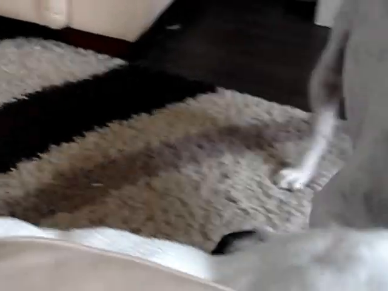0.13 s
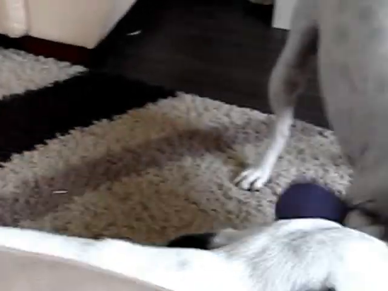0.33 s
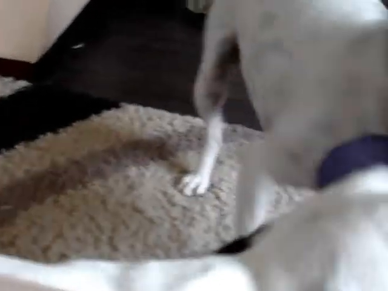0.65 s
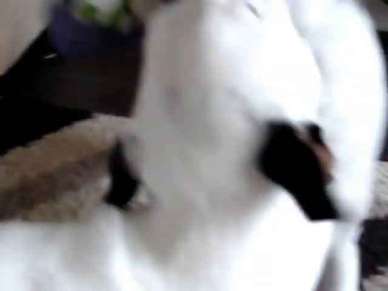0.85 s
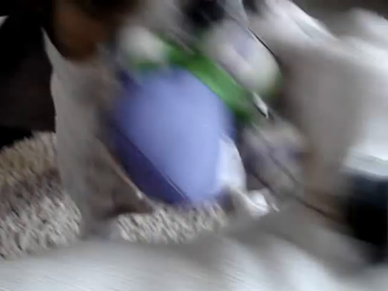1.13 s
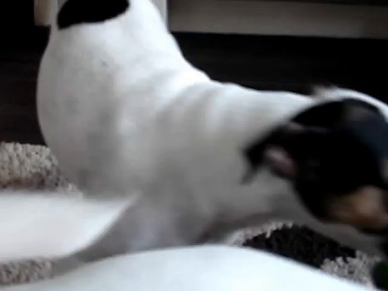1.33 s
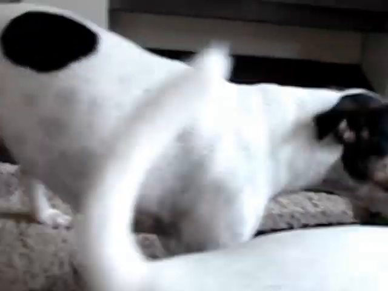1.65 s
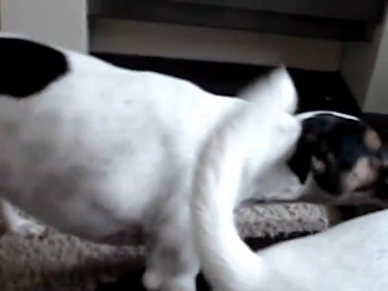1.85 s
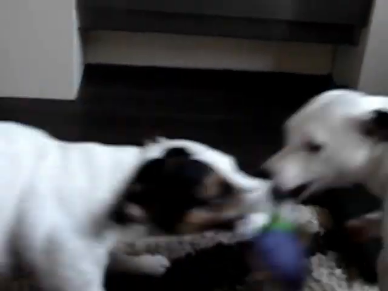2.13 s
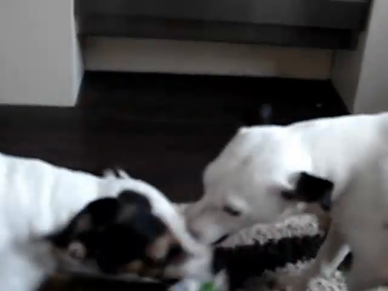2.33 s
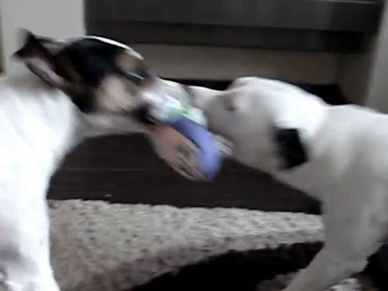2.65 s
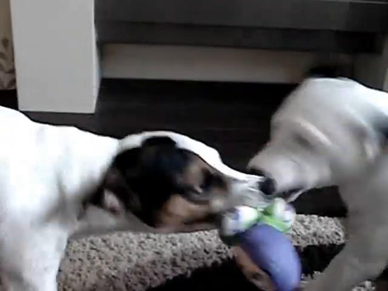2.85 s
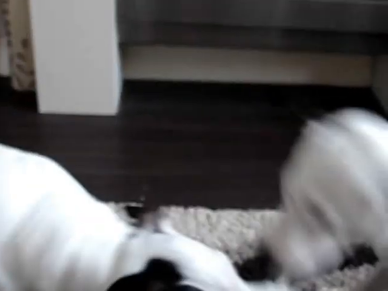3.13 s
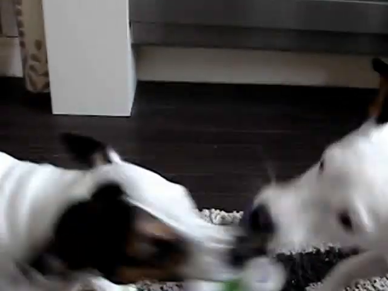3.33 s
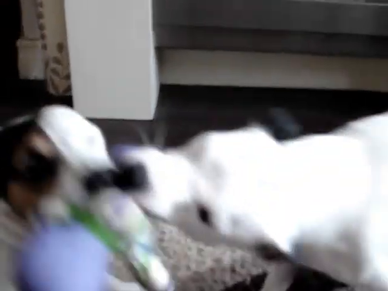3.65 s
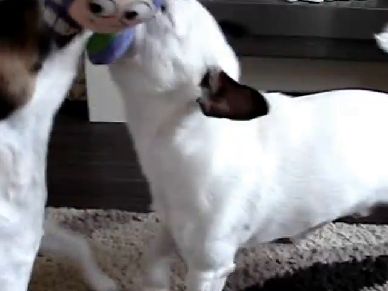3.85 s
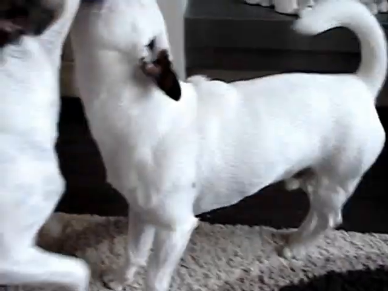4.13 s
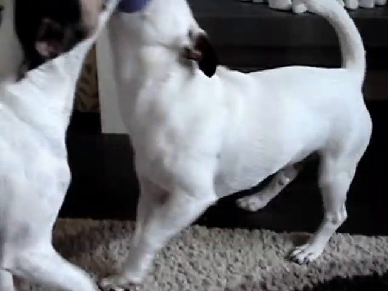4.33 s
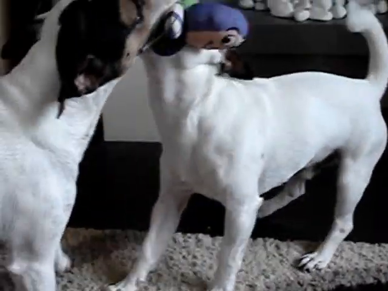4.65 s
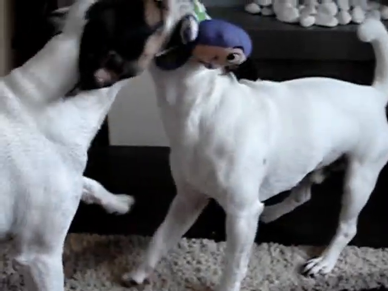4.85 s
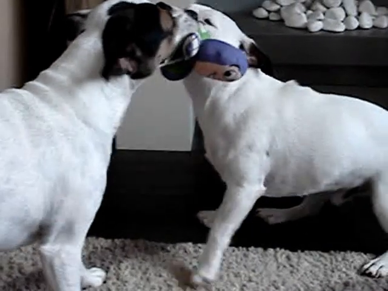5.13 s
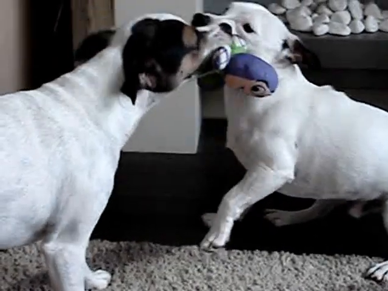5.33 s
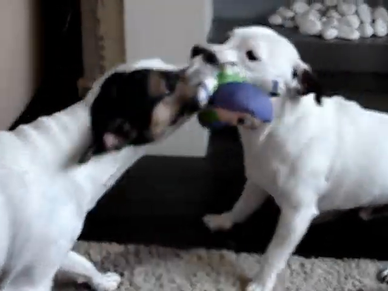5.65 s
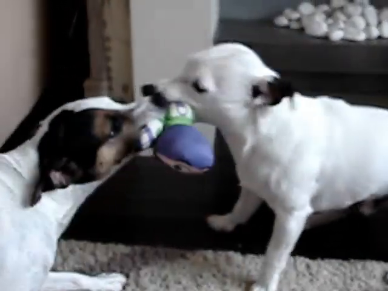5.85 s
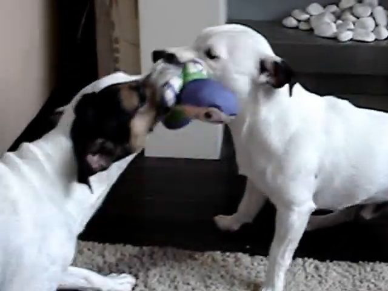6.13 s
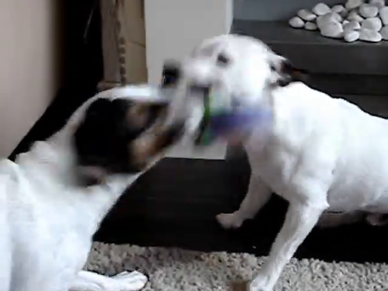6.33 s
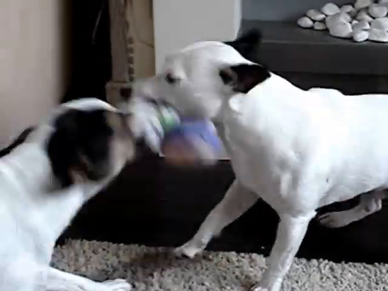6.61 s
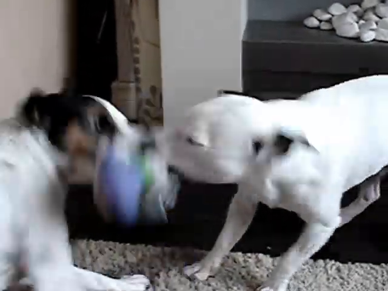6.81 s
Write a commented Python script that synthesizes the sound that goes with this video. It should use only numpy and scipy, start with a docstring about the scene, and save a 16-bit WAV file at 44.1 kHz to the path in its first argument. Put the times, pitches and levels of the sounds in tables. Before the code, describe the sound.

A quiet room with faint noise, heard close up. Claw ticks at 0.1-0.25 s, then from 0.35 to 0.95 s a higher dog growls in jerky surges around 200-290 Hz, half moan, half snarl, with a loud hollow jaw snap at 0.6 and a snuffle after. A lull with ticks near 1.2; softer voiced growls from 1.35 to 1.85. A low rattling growl, mostly near 140 Hz, rolls at 1.9-2.4; the higher one answers until 2.9. The low dog growls again 3.0-3.7, with a sharp tick and scuff at 3.25 and jaw snaps with teeth clicks at 3.35-3.65. Low, subdued rattles run 4.0-5.2. A paw swishes at 5.17, then the higher growl swells 5.35-5.95. The low growl returns 6.05-6.4. From 6.48 to the end a fierce, rough high snarl bursts out, by far the loudest sustained passage, with snorting, grinding and bumps, overloading the microphone.

```python
"""Two small dogs growl in bouts over a plush toy on a living-room rug: one higher and half-voiced, one a low
rattle. Pulses from their vocal folds pass through resonances of throat and mouth; jerks on the toy and hard
starts make the growls surge. Shaped noise makes the snuffles, rustling, scuffs and claw ticks; uneven clicks
make the grinding teeth. Fading tones make the jaw snaps. A room answers, and the loudest moments, such as the
last snarl, overload the microphone."""
import sys
import numpy as np
from scipy import signal
from scipy.fft import rfft, irfft, next_fast_len
from scipy.io import wavfile
from scipy.ndimage import uniform_filter1d, map_coordinates

SR = 44100
rng = np.random.default_rng(int(sys.argv[2]) if len(sys.argv) > 2 else 0)


def materialize(psi):
    """Save the field psi as 16-bit PCM at rate SR to the path in sys.argv[1].

    A 1-D psi becomes a single channel; in a 2-D psi each row is a channel.
    """
    bounded = np.clip(np.atleast_2d(psi).T, -1, 1)
    quanta = np.round(bounded * 32767).astype(np.int16)
    wavfile.write(sys.argv[1], SR, quanta)


N = 307818
TIME = np.arange(N) / SR   # seconds

# A bout is a chain of pushes of air; each swells, peaks and sags. Levels are those before the later trims.
# higher dog: (start [s], rise [s], fall [s], level [dB], roughness at the peak [0-1], mouth resonance [Hz],
#              muzzle resonance [Hz], then relative to the level: chest, throat, snarl, muzzle, rasp [dB])
HIGH_PUSHES = [(0.327, 0.057, 0.03, -30, 0.7, 1010, 2380, -5.5, -4, -9.5, -22, -23),
               (0.39, 0.068, 0.019, -17.5, 0.29, 994, 2440, -5.5, -9, -13, -23.5, -21.5),
               (0.465, 0.026, 0.088, -18.5, 0.26, 975, 2530, -5, -11, -20, -25, -23),
               (0.58, 0.02, 0.17, -24, 0.55, 1040, 2550, -4.5, -4.5, -10.5, -22.5, -16),
               (0.744, 0.092, 0.11, -20.5, 0.65, 980, 2820, -4.5, -6.5, -9.5, -22, -14.5),
               (1.36, 0.093, 0.038, -24.5, 0.24, 1060, 2160, -4, -8, -16, -24, -20),
               (1.48, 0.015, 0.11, -28, 0.15, 1080, 2140, 1, -9.5, -8.5, -15, -22),
               (1.601, 0.19, 0.055, -33.5, 0.17, 1010, 2235, 3, -10, -8, -19.5, -17.5),
               (2.339, 0.093, 0.031, -28, 0.3, 1020, 2550, 0.5, -6.5, -10.5, -13.5, -19.5),
               (2.465, 0.019, 0.084, -28, 0.16, 1025, 2552, 1, -9.5, -9, -18, -16),
               (2.604, 0.05, 0.053, -21.5, 0.3, 927, 2200, -7, -15.5, -14.5, -20, -18),
               (2.732, 0.11, 0.032, -20, 0.19, 955.5, 2322, -7.5, -13, -16, -23, -22),
               (4.159, 0.13, 0.084, -32.5, 0.36, 999.6, 2301, -0.5, 0.5, -10, -16, -13),
               (5.327, 0.099, 0.093, -26.5, 0.66, 1018, 2510, -9.5, -8, -17.5, -17.5, -22),
               (5.524, 0.13, 0.046, -16.5, 0.36, 1014, 2490, -14.5, -11, -20.5, -19, -44),
               (5.669, 0.067, 0.059, -17, 0.09, 995, 2550, -10, -6, -16, -21.5, -32),
               (5.79, 0.02, 0.026, -20.5, 0.4, 992.4, 2519, -13.5, -9, -14, -16.5, -39),
               (5.834, 0.057, 0.1, -25, 0.18, 973.3, 2452, -5.5, -8, -17, -22.5, -41),
               (6.483, 0.0072, 0.025, -16, 0.58, 1005, 2500, -16, -4.5, -15, -17.5, -15.5),
               (6.52, 0.0086, 0.056, -7.5, 0.65, 884, 2325, -16.5, -6, -12.5, -23, -31),
               (6.575, 0.017, 0.039, -8.5, 0.55, 994, 2414, -16, -14.5, -12.5, -28, -30),
               (6.655, 0.021, 0.02, -13, 0.6, 963, 2429, -12, -10, -20, -21.5, -31),
               (6.705, 0.016, 0.047, -12, 0.4, 969, 2440, -11, -13.5, -23, -28, -32),
               (6.767, 0.039, 0.02, -11, 0.5, 1019, 2440, -12, -9, -21, -20.5, -24),
               (6.818, 0.046, 0.14, -10, 0.48, 1035, 2406, -17, -14.5, -17, -22.5, -24)]
# lower dog: (start [s], rise [s], fall [s], level [dB], pitch [Hz], roughness at the peak [0-1],
#             mouth resonance [Hz], then relative to the level: chest, throat, snarl [dB])
LOW_PUSHES = [(0.07, 0.15, 0.04, -44, 127.5, 1.0, 990, -26.0, -25, -33),
              (1.86, 0.0076, 0.076, -31.0, 87.67, 0.7, 961, -2.0, -6, -9.5),
              (1.956, 0.088, 0.12, -36.0, 143.1, 0.5, 1151, 5.0, -1.5, -30),
              (2.184, 0.14, 0.12, -27.5, 142.8, 0.7, 1088, 1.5, -6, -22),
              (2.959, 0.14, 0.095, -21.0, 143.6, 0.6, 1000, -4.0, -9.5, -32.5),
              (3.206, 0.15, 0.074, -25.5, 136.9, 0.7, 1094, 1.0, -4.5, -25),
              (3.445, 0.062, 0.067, -26.5, 139.9, 0.42, 915, -3.0, -8, -5.5),
              (3.622, 0.024, 0.049, -31, 139.3, 1.0, 949, -27.5, -11, -25),
              (4.034, 0.013, 0.12, -37.5, 85.33, 0.8, 987, -5.0, 2, -10.5),
              (4.339, 0.08, 0.2, -26.0, 123.5, 0.85, 948.3, -5.0, -4, -14),
              (4.511, 0.207, 0.194, -27, 137.3, 0.75, 950, -2.0, -2.5, -16.5),
              (4.899, 0.11, 0.24, -37, 133, 0.42, 929.3, 5.5, -2, -21),
              (5.195, 0.06, 0.041, -40.0, 84.93, 0.1, 972.3, -4.5, -12, -20),
              (6.035, 0.0088, 0.24, -23.5, 140.3, 0.63, 965, -6.0, -9, -28.5),
              (6.22, 0.15, 0.19, -28.5, 134.6, 0.7, 975.5, -1.5, -9, -28)]

SAG_DB, SAG_CURVE = 8.5, 1.6   # how much weaker a push is at its ends than at its peak; shape of the arch
ATTACK_S, RELEASE_S = 0.08, 0.18   # time for 60 dB up before a push, and for 60 dB down after it


def from_db(db):
    """Turn decibels into a gain."""
    return 10 ** (np.asarray(db) / 20)


def rms_one(x):
    """Scale a sound to unit power."""
    return x / np.sqrt(np.mean(x ** 2) + 1e-20)


def drift(rate_hz):
    """A smooth random wander of unit power, with rate_hz new random values a second."""
    knots = rng.standard_normal(4000)
    coarse_time = TIME[::20]
    coarse = map_coordinates(knots, [coarse_time * rate_hz], order=3, mode="wrap")
    return rms_one(np.interp(TIME, coarse_time, coarse))


def colour(x, spectrum):
    """Filter a sound to a spectrum without smearing it backwards in time (minimum phase)."""
    size = 2 * next_fast_len(N // 2 + SR // 10)
    hz, db = np.transpose(spectrum)
    bins = np.maximum(np.fft.rfftfreq(size, 1 / SR), 1)
    gain = from_db(np.interp(np.log(bins), np.log(hz), db))
    # folding the cepstrum onto positive times makes the filter causal
    cepstrum = irfft(np.log(gain))
    cepstrum[1:size // 2] *= 2
    cepstrum[size // 2 + 1:] = 0
    response = np.exp(rfft(cepstrum))
    return irfft(rfft(x, size) * response)[:N]


def noise(spectrum):
    """Coloured noise of unit power."""
    return rms_one(colour(rng.standard_normal(N), spectrum))


def band(x, edges, order=4):
    """Keep the sound between two frequencies."""
    return signal.sosfilt(signal.butter(order, edges, "band", fs=SR, output="sos"), x)


def resonance(x, hz, width_hz):
    """A fixed two-pole resonance with gain 1 at its top."""
    r = np.exp(-np.pi * width_hz / SR)
    zeros = np.array([1, 0, -1]) * (1 - r * r) / 2
    poles = [1, -2 * r * np.cos(2 * np.pi * hz / SR), r * r]
    return signal.lfilter(zeros, poles, x + 1e-18)


def formant(x, hz, width_hz, size=256):
    """A two-pole resonance of the vocal tract whose centre moves, stepped block by block."""
    r = np.exp(-np.pi * width_hz / SR)
    state, out = np.zeros(2), np.zeros(N)
    for i in range(0, N, size):
        poles = [1, -2 * r * np.cos(2 * np.pi * hz[i] / SR), r * r]
        out[i:i + size], state = signal.lfilter([1, 0, -1], poles, x[i:i + size], zi=state)
    return out


def even(x, size=1500):
    """Hold the slow level at 1; pulses and flutter stay."""
    power = uniform_filter1d(uniform_filter1d(x ** 2, size), size)
    return x / np.sqrt(np.maximum(power, 1e-14))


def burst(s, decay_s):
    """Noise that starts at once and dies away."""
    age = TIME - s
    fade = (age >= 0) * np.exp(-np.minimum(np.abs(age) / decay_s, 20))
    return rng.standard_normal(N) * (fade + 1e-18)


def push(start, rise, fall, attack_s=ATTACK_S, release_s=RELEASE_S):
    """One push: its sag (0 at the peak, 1 at both ends) and the dB of its attack and release."""
    past_peak = TIME - start - rise
    way = np.maximum(-past_peak / max(rise, .002), past_peak / max(fall, .002))
    before = np.maximum(start - TIME, 0) / attack_s
    after = np.maximum(past_peak - fall, 0) / release_s
    return np.minimum(way, 1) ** SAG_CURVE, -60 * np.minimum(before + after, 4)


def swells(rows, **edges):
    """Gain of a series of pushes, added as powers."""
    power = 0
    for start, rise, fall, db in rows:
        sag, edge_db = push(start, rise, fall, **edges)
        power = power + from_db(db - SAG_DB * sag + edge_db) ** 2
    return np.sqrt(power)


def background():
    """Quiet room noise with a faint, narrow band of high noise."""
    # tone of the room noise: (frequency [Hz], relative level per hertz [dB])
    floor_colour = [(18, -52.5), (30, -0.5), (779, 9), (1780, 0), (3110, -3.5), (7650, -9.5), (10000, -12),
                    (13000, -66.5), (22000, -120)]
    whine = rms_one(resonance(rng.standard_normal(N), hz=7710, width_hz=260))
    return from_db(-47.5) * noise(floor_colour) + from_db(-66) * whine


def buffets():
    """Low rumble of bumps and moving air on the microphone, made of swelling low noise."""
    # bumps and puffs of air: (start [s], rise [s], fall [s], level [dB])
    puffs = [(.592, 0.0057, 0.011, -31), (6.515, 0.016, 0.031, -25), (6.57, 0.014, 0.048, -24.5),
             (6.66, 0.0089, 0.013, -34), (6.8, 0.038, .03, -31.5), (6.88, 0.022, 0.03, -31)]
    # tone of the rumble: (frequency [Hz], relative level per hertz [dB])
    rumble_colour = [(15, 5), (40, -9), (110, -9.5), (200, -10), (600, -68)]
    return swells(puffs, attack_s=0.07, release_s=0.07) * even(noise(rumble_colour))


def rustle():
    """Fur and plush rub softly: noise that follows the dogs' effort, plus some longer rubs."""
    # longer rubs: (start [s], rise [s], fall [s], level before the flicker and trim [dB])
    rubs = [(.78, 0.23, 0.031, -29.5), (3.0, 0.29, 0.13, -40.5), (3.52, 0.15, 0.17, -36.5),
            (5.36, 0.047, 0.12, -38)]
    # tone of the rustle: (frequency [Hz], relative level per hertz [dB])
    rustle_colour = [(1000, -6.5), (3000, 5), (4600, -3), (5600, -3), (7800, -3.5), (10000, -8.5)]
    rest_db, effort_db, follows = -71, -33.5, 0.44   # before the trim; follows: share of the effort's dB swing
    effort = swells([row[:4] for row in HIGH_PUSHES + LOW_PUSHES])
    moving = from_db(effort_db) * effort ** follows
    rubbing = np.sqrt(from_db(rest_db) ** 2 + moving ** 2 + swells(rubs) ** 2)
    flicker = from_db(-6.0 + 2.0 * drift(83) + 0.37 * drift(55))   # -6 dB is the trim
    return noise(rustle_colour) * rubbing * flicker


def snuffles():
    """A dog blows air past the toy and through its nose: swelling noise."""
    # breaths: (start [s], rise [s], fall [s], level before a 2 dB lift [dB])
    breaths = [(.775, 0.025, 0.26, -38.5), (3.47, 0.031, 0.081, -36), (3.63, 0.039, 0.23, -44),
               (4.925, 0.03, 0.047, -44), (6.52, 0.034, 0.085, -27.5), (6.87, 0.03, 0.034, -32)]
    # tone of the air: (frequency [Hz], relative level per hertz [dB])
    breath_colour = [(150, -7), (400, 6), (1000, 4.5), (1700, 3.5), (3000, 0.5), (4200, -0.5), (5200, -9.5),
                     (10000, -45)]
    return from_db(2.0) * swells(breaths) * noise(breath_colour)


def scuffs():
    """A paw slides over the pile with a short, bright swish of fading noise."""
    # slides of a paw: (time [s], level before the band filter and trim [dB], decay [s])
    paw_slides = [(3.243, -35, 0.011), (5.173, -28.5, 0.023), (6.541, -19, 0.0028), (6.583, -33, 0.0065)]
    slides = sum(from_db(db) * burst(s, decay) for s, db, decay in paw_slides)
    return from_db(-6.0) * band(slides, [3200, 8000], order=2)


def claws():
    """Each claw on the floor gives a short, bright tick that rings for an instant."""
    # ticks: (time [s], peak before the room [dB], ring [Hz])
    ticks = [(0.096, -33, 2900), (0.2027, -30.5, 2140), (0.235, -31, 1970), (1.1748, -33, 2523),
             (1.2213, -25.5, 2370), (3.248, -19, 2450), (3.798, -30, 2260)]
    out = 0
    for s, db, hz in ticks:
        tick = band(burst(s, decay_s=0.0011), [0.86 * hz, 1.16 * hz], order=2)
        out = out + from_db(db) * tick / np.abs(tick).max()
    return out


def snaps():
    """The jaws clap shut on the toy with one hollow knock made of fading tones."""
    # claps of the jaws: (time [s], peak before the room [dB])
    claps = [(0.5923, -0.5), (3.3587, -11), (3.3973, -7), (3.631, -11.5)]
    # tones of the knock: (frequency [Hz], width [Hz], relative level [dB])
    jaw_modes = [(660, 91, 0.5), (944, 51, 4.5), (1500, 400, -27), (2450, 600, -28)]
    out = 0
    for s, db in claps:
        age = np.clip(TIME - s, 0, .05)
        knock = 0
        for hz, width, mode_db in jaw_modes:
            fade = np.exp(-np.pi * width * age)   # a wider mode dies away sooner
            knock = knock + from_db(mode_db) * fade * np.sin(2 * np.pi * hz * age)
        knock = band(knock, [380, 3500], order=3)
        out = out + from_db(db) * knock / np.abs(knock).max()
    return out


def crunches():
    """Grinding teeth catch and slip on the toy in short runs of uneven clicks."""
    # runs of grinding: (start [s], rise [s], fall [s], level before the room [dB])
    grinds = [(.675, 0.0055, 0.02, -32.5), (.775, 0.034, .03, -30), (1.862, 0.015, 0.021, -52),
              (3.358, 0.0038, 0.004, -21), (3.394, 0.0044, 0.0093, -28.5), (3.62, 0.0079, 0.0079, -27.5),
              (6.52, 0.0052, 0.025, -19), (6.575, 0.0081, 0.034, -26)]
    # tone of the clicks: (frequency [Hz], relative gain [dB])
    click_colour = [(600, -41.5), (1450, -3), (1950, 2), (2650, 2), (3500, -18.5), (5500, -17.5),
                    (10000, -40)]
    slips_per_s, spread_db, edge_s = 1000, 17.5, 0.017   # rate, unevenness, time for 60 dB up or down
    slipping = rng.random(N) < slips_per_s / SR
    slips = slipping * rng.choice([-1, 1], N) * from_db(spread_db * rng.standard_normal(N))
    clicks = even(colour(slips, click_colour), size=500)
    return swells(grinds, attack_s=edge_s, release_s=edge_s) * clicks


def controls(growls, size=40):
    """Roughness, a row's two frequencies and the register gains; where pushes overlap the stronger one leads."""
    # how far each register follows the sag: mouth, chest, throat, snarl, muzzle, rasp [share]
    sag_shares = [1, .71, 0.72, 0.8, 0.77, 0.63]
    rougher_at_ends = 0.06   # as the pressure sags the folds beat less evenly
    time, power, lead, steered = TIME[::size], 0, 0, 0
    for start, rise, fall, db, rough, first_hz, second_hz, *registers_db in growls:
        sag, edge_db = (curve[::size] for curve in push(start, rise, fall))
        levels_db = db + np.array([0, *registers_db])
        gains = from_db(levels_db[:, None] - SAG_DB * np.outer(sag_shares, sag) + edge_db)
        weight = gains[1] ** 2   # the chest's power decides who leads
        aims = np.broadcast_arrays(rough + rougher_at_ends * sag, first_hz, second_hz)
        steered = steered + weight * np.array(aims)
        power, lead = power + gains ** 2, lead + weight
    curves = [*steered / lead, *np.sqrt(power)]
    rough, first_hz, second_hz, *gains = (np.interp(TIME, time, curve) for curve in curves)
    return rough, first_hz, second_hz, np.array(gains)


def folds(pitch, rough, jitter, shimmer_db, waver, flutter_hz, flutter_db, air, swing):
    """Vocal folds: a pulse per closure; roughness upsets timing and strength, adds air and a rattle of loose tissue."""
    rough = np.clip(rough, 0, 1.2)
    cycles = np.cumsum(pitch * (1 + waver * rough * drift(60))) / SR
    at = np.flatnonzero(np.diff(np.floor(cycles)))
    late, strong = rng.standard_normal((4000, 2))[:len(at)].T
    shift = jitter * rough[at] * late * SR / pitch[at]
    closures = np.clip(at + shift, 0, N - 1).astype(int)
    pulses = np.zeros(N)
    pulses[closures] = from_db(shimmer_db * rough[at] * strong)
    # air hisses through the gap just after each pulse
    gap = signal.lfilter([1], [1, -np.exp(-1 / (0.0086 * SR))], pulses)
    hiss = rms_one(gap * rng.standard_normal(N))
    flow = rms_one(pulses) + air * rough ** 0.52 * hiss
    # folds that beat evenly also swing smoothly, which firms up the fundamental
    tone = swing * np.maximum(1 - rough, 0) * np.cos(2 * np.pi * cycles)
    rattle = from_db(flutter_db * rough ** 0.93 * np.tanh(drift(flutter_hz)))
    return tone + flow * rattle


def growl(flow, tract, gains, mouth_hz, muzzle_hz, trims_db, nose_db):
    """The tract colours the pulses; effort and mouth shape set how strongly its registers and the nose speak."""
    # registers of the voice: mouth, chest, throat, snarl, muzzle, rasp of bared teeth: (low [Hz], high [Hz])
    register_edges = [(830, 1230), (70, 380), (380, 780), (1390, 2100), (1900, 3000), (2750, 4300)]
    # with the lips closed on the toy the nose rings: (frequency [Hz], width [Hz], level before trim [dB])
    nose_modes = [(2680, 200, -20.5), (4140, 370, -26.5), (5360, 590, -25.5)]
    # sudden surges, some from jerks on the toy, some from the hard start of a growl: (time [s], full boost
    # [dB], spread to each side [s])
    boosts = [(0.468, 4, .006), (0.506, 8, .004), (0.596, 12, .0042), (0.641, 7, .004), (1.346, 8, .005),
              (2.843, 3.5, .009), (3.004, 5, .005), (3.24, 5, .004), (3.283, 6, .004), (3.401, 7, .004),
              (4.195, 5, .006), (4.703, 5, .005), (4.765, 4, .005), (5.328, 6, .003), (5.368, 8, .004),
              (5.408, 8, .004), (6.272, 4, .003), (6.624, 6, .005), (6.972, 4, .004)]
    # how much of a surge's boost each register gets, in the order of the registers [share]
    boost_shares = [1, .3, .9, .7, .7, .7]

    voice = colour(flow, tract)
    mouth = formant(voice, mouth_hz * (1 + 0.027 * drift(25)), width_hz=170)
    # flapping lips tear the snarl into strokes, and the upper resonances wander as they move
    torn = voice * from_db(2.25 * drift(75))
    # this resonance opens as the lips draw back
    snarl = formant(torn, 1510 * (1 + 0.03 * drift(18)), width_hz=280)
    muzzle = formant(torn, muzzle_hz * (1 + 0.018 * drift(22)), width_hz=250)
    sources = [mouth, voice, voice, snarl, muzzle, torn]
    registers = [even(band(x, edges)) for x, edges in zip(sources, register_edges)]

    nose = 0
    for hz, width, db in nose_modes:
        ring = resonance(resonance(flow, hz, width), hz, 2 * width)
        nose = nose + from_db(db + nose_db + 4.0 * drift(30)) * even(ring)
    # open lips (a strong snarl) let the sound out before it reaches the nose
    leak = 7 * gains[3] / gains[0]
    nose_gain = np.sqrt(gains[0] * gains[1]) / (1 + leak ** 2)

    surge_db = sum(db * np.exp(-.5 * ((TIME - s) / spread) ** 2) for s, db, spread in boosts)
    surges = from_db(np.array(trims_db)[:, None] + np.outer(boost_shares, surge_db))
    return np.sum(gains * surges * registers, axis=0) + nose_gain * nose


def lower_dog():
    """Slack folds beat slowly and unevenly, so the low growl rattles."""
    # slope of the low vocal tract: (frequency [Hz], relative gain [dB])
    low_tract = [(55, -39), (82, -15), (110, -9), (145, -4.5), (195, 3), (275, 9), (380, -12), (500, -15.5),
                 (660, -7), (1100, -10.5), (1350, -23.5), (1600, -34), (2200, -32), (4500, -43.5)]
    rows = []
    for start, rise, fall, db, hz, rough, mouth_hz, chest, throat, snarl in LOW_PUSHES:
        muzzle = -10 + 0.51 * snarl   # the muzzle follows about half of the snarl's dB
        rasp = snarl - 11.5
        rows.append((start, rise, fall, db, rough, hz, mouth_hz, chest, throat, snarl, muzzle, rasp))
    rough, pitch, mouth_hz, gains = controls(rows)
    flow = folds(pitch, rough, jitter=0.1705, shimmer_db=3.2, waver=.14,
                 flutter_hz=89.3, flutter_db=2.5, air=0.98, swing=0.11)
    return growl(flow, low_tract, gains, mouth_hz, muzzle_hz=2370,
                 trims_db=[-0.76, 0.64, 0.78, -1.7, .3, -0.62], nose_db=-3.5)


def higher_dog():
    """A pitched growl that swings between a clear moan and a rough snarl as the folds beat more or less evenly."""
    # slope of the high vocal tract: (frequency [Hz], relative gain [dB])
    high_tract = [(60, -31.5), (100, -17.5), (200, 3), (290, 6), (380, -12), (520, -8), (680, 1.5),
                  (1000, 2), (1300, -3), (2200, -20.5), (2750, -25.5), (3300, -24), (4500, -27)]
    # pitch bout by bout; it scoops up as the air builds and breaks down into a low moan: (time [s], pitch [Hz])
    pitch_line = [(.37, 155.5), (.455, 255.1), (.49, 244.6), (.53, 219), (.64, 203.2), (.69, 237.4),
                  (.78, 237), (.87, 287.4), (1.34, 186.2), (1.4, 202.3), (1.46, 256.5), (1.51, 268),
                  (1.585, 282.6), (1.607, 194.5), (1.78, 198.8), (2.39, 190.1), (2.425, 238.5), (2.49, 245),
                  (2.58, 183.7), (2.66, 221), (2.7, 212.7), (2.745, 233.8), (2.785, 225), (2.825, 253.1),
                  (2.88, 264.9), (4.16, 232.8), (4.23, 211.3), (4.33, 228.4), (5.36, 238.2), (5.5, 213.1),
                  (5.56, 252.2), (5.65, 265.7), (5.73, 255.5), (5.81, 240), (5.99, 219.7), (6.48, 250.9),
                  (6.53, 289.7), (6.61, 275.7), (6.66, 238.7), (6.73, 236.6), (6.79, 255), (6.9, 270.7),
                  (6.97, 258)]
    rough, mouth_hz, muzzle_hz, gains = controls(HIGH_PUSHES)
    pitch = np.interp(TIME, *np.transpose(pitch_line))
    flow = folds(pitch, rough, jitter=.13, shimmer_db=7, waver=.1,
                 flutter_hz=70.85, flutter_db=7, air=1.2, swing=0.04)
    return growl(flow, high_tract, gains, mouth_hz, muzzle_hz,
                 trims_db=[-0.5, 1.3, 4.5, -1.4, 2.5, -4.0], nose_db=-2.5)


def room(x, t60, wet_db, dull_hz, count=4):
    """Scattered reflections of a furnished room, shifting as the dogs move, and the objects that ring in it."""
    # hard objects that ring along: (frequency [Hz], width [Hz], gain before the scene's trim [dB])
    ringing_objects = [(1315, 11.3, 17.5), (1401, 5.5, 10.5)]
    age = TIME[:SR // 2]
    fade = from_db(-60 * age / t60) * (age > .003)
    tails = rng.standard_normal((count, len(age))) * fade
    tails = band(tails / np.linalg.norm(tails[0]), [400, dull_hz], order=2)
    # the mix of the tails wanders, which changes the pattern of reflections
    places = np.array([drift(5) for _ in tails])
    places = places / np.linalg.norm(places, axis=0)
    echoes = sum(signal.fftconvolve(x * place, tail)[:N] for place, tail in zip(places, tails))
    rings = sum(from_db(db) * resonance(x, hz, width) for hz, width, db in ringing_objects)
    return from_db(wet_db) * echoes + rings


def scene():
    """Both dogs and their scuffle in the room, over a quiet floor of noise."""
    dogs = claws() + snaps() + crunches() + lower_dog() + higher_dog()
    heard = from_db(-1.34) * (dogs + room(dogs, t60=0.26, wet_db=-2.0, dull_hz=5600))
    return (background() + buffets() + rustle() + snuffles() + scuffs() + heard)[None]


def record(dry):
    """The microphone overloads sooner on the wave's positive side than on its negative side, and the top is cut."""
    top = np.where(dry > 0, .76, .98)
    limited = dry / (1 + (dry / top) ** 16) ** (1 / 16)
    low_pass = signal.ellip(10, .1, 70, 10100, fs=SR, output="sos")   # cut above 10100 Hz
    return signal.sosfilt(low_pass, limited)


dry = scene()
out = record(dry)
materialize(out)
```